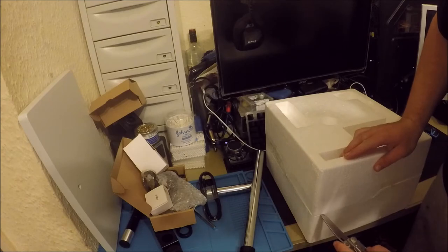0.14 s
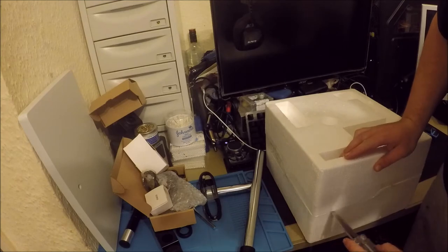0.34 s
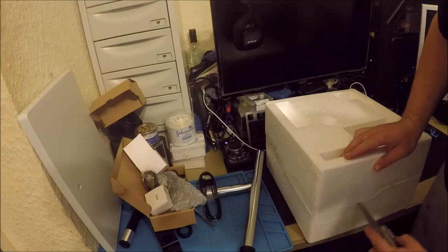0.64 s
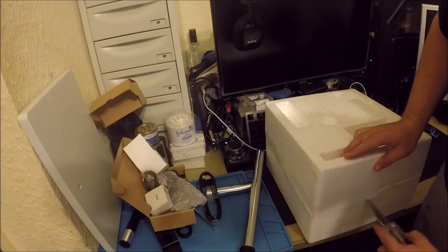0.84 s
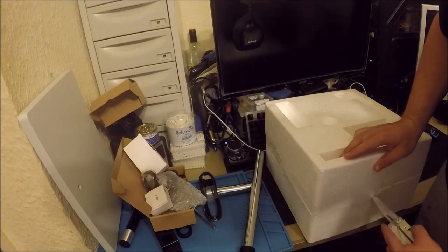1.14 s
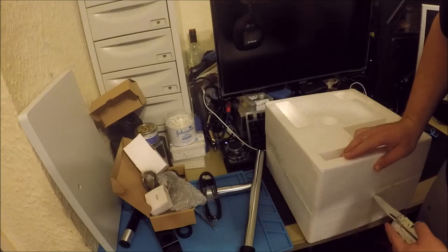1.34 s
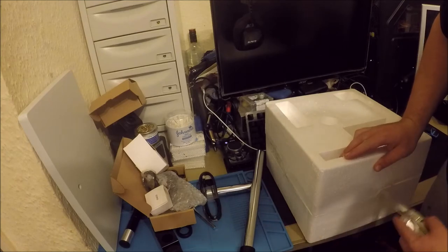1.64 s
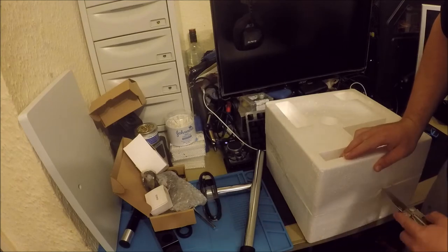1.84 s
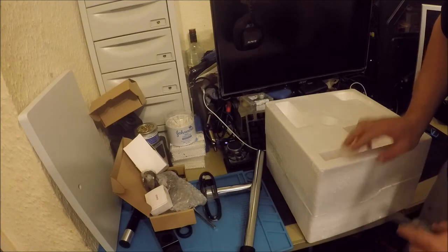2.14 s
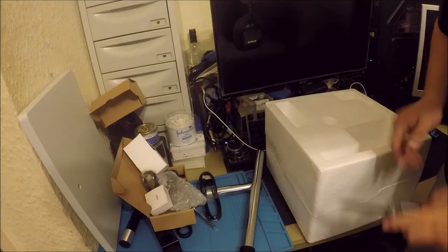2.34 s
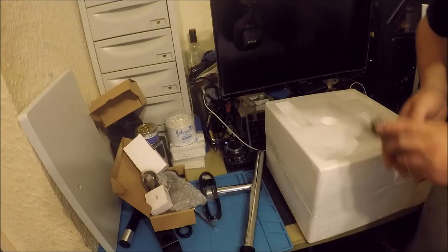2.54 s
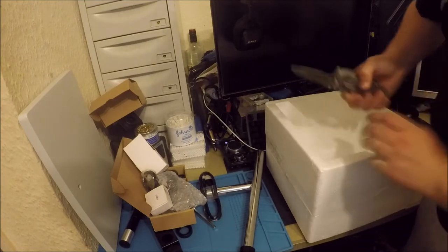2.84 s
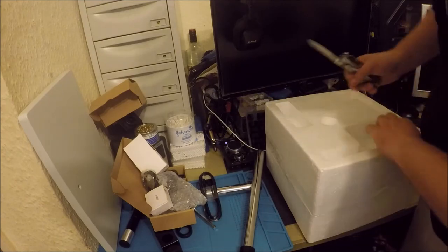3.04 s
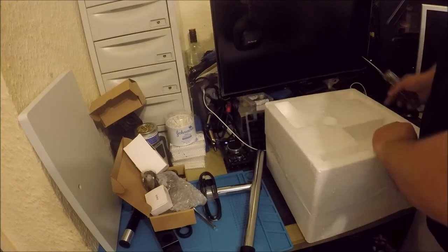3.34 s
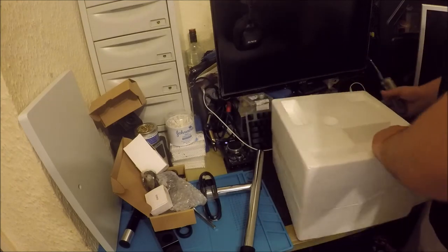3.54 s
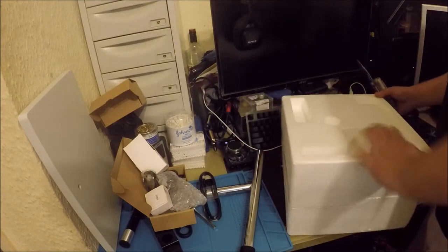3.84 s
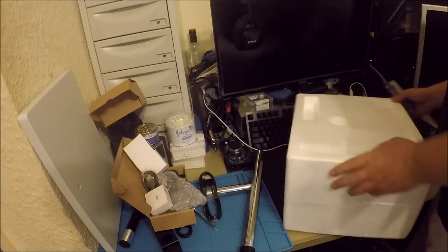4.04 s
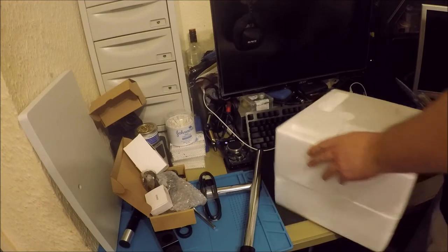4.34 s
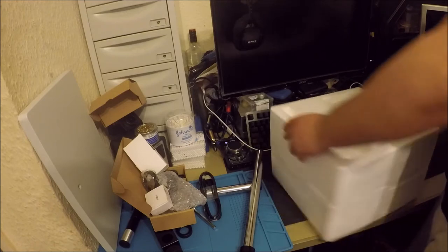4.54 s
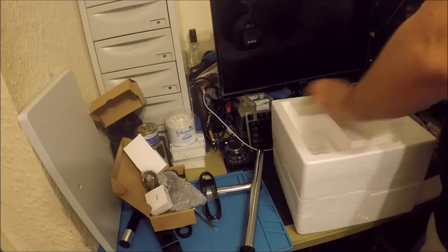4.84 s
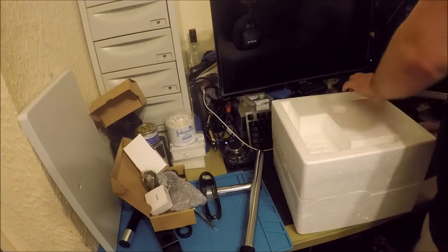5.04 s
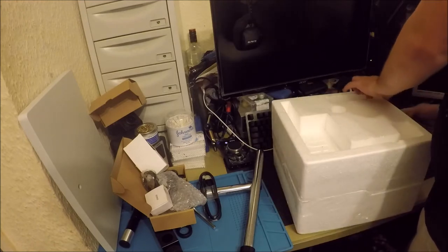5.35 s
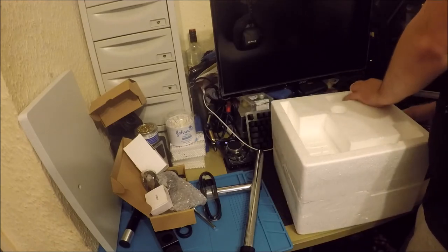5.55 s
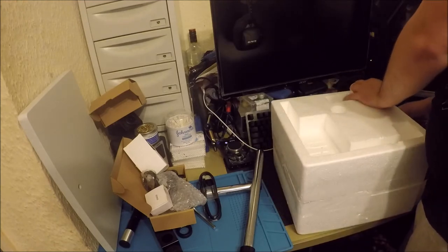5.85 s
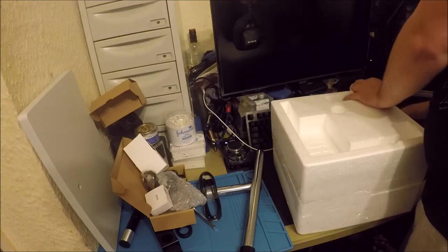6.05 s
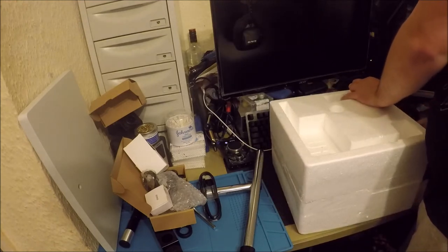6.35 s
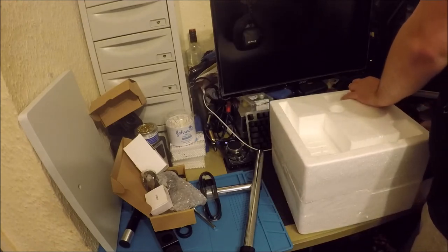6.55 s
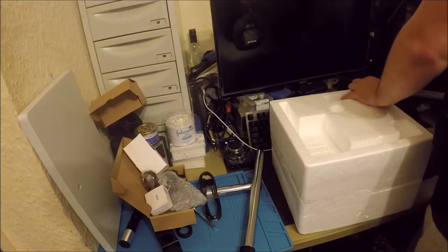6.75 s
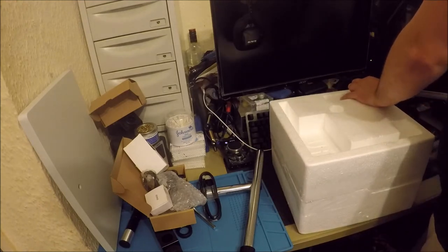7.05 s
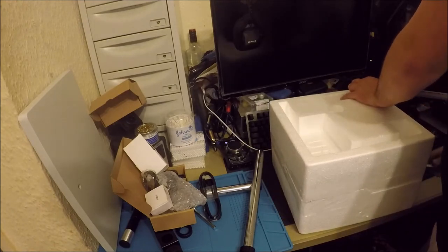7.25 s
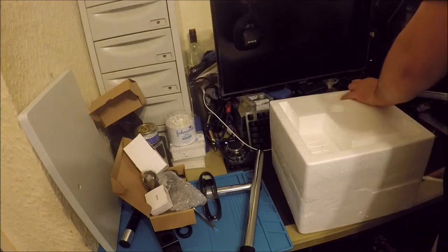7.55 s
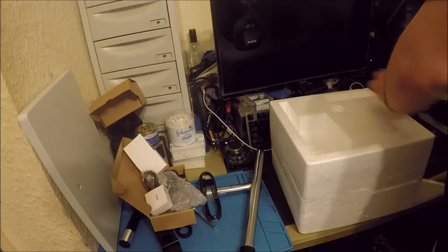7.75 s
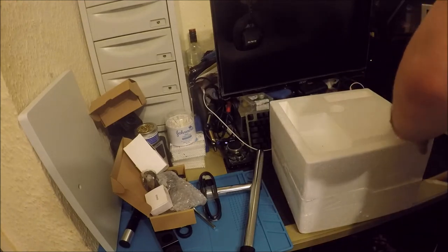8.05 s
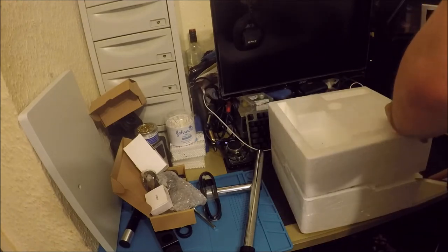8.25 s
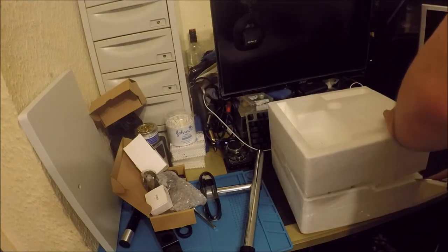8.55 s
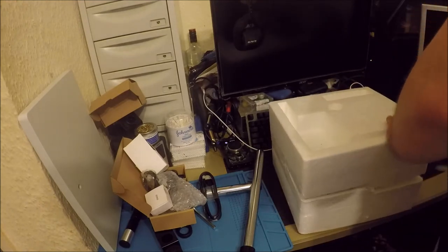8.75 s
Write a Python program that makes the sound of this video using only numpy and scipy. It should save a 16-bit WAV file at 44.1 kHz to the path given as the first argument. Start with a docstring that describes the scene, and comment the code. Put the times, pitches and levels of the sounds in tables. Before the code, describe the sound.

A hollow polystyrene box is handled close to the microphone in a small dry room, over faint low mains hum and hiss. From 0.1 to 2.1 seconds a knife makes short, uneven gritty strokes through tape, with a sharp snap at 0.5 and a harder one at 1.6. Near-quiet follows, with a barely audible puff and soft dull bump around 2.7. From 3.2 to 4.7 the box slides round in a jerky scrape, growing fuller, with clustered snaps, judders and a low grunt near 4.2. Light fingertips hiss and brighten at 5.1 to 5.4. Crackling pushes strain the lid from 5.4, with the loudest crack at 5.75. From 6 to 8 the foam creaks softly beneath pushes, pops and hollow slips, with a dense burst around 8.0 to 8.15. Another snap comes at 8.35, then a smooth sweep near 8.8.

```python
"""A polystyrene packing box on a workbench: a knife slits the tape along its seam, the box is slid round,
then fingers prise the tight lid up. Random bead releases make hiss and crackle; short noise runs make rasps,
decaying bursts make snaps and pops, and wavering sines make low grunts and one faint puff of air.
Peaks of the hollow box colour most of them.
A small room answers with short noise tails, over a low mains hum and a faint hiss."""
import sys
import numpy as np
from scipy import signal
from scipy.fft import rfft, irfft, next_fast_len
from scipy.io import wavfile
from scipy.ndimage import uniform_filter1d, map_coordinates

SR = 44100
rng = np.random.default_rng(int(sys.argv[2]) if len(sys.argv) > 2 else 0)


def waveform_to_disk(signal):
    """Save audio, clipped to [-1, 1], as 16-bit WAV at the path in sys.argv[1]."""
    frames = np.transpose(np.atleast_2d(signal))
    scaled = np.clip(frames, -1, 1) * 32767
    samples = np.round(scaled).astype(np.int16)
    wavfile.write(sys.argv[1], SR, samples)


N = 392490

# colour of smooth sliding: (frequency [Hz], relative level per Hz [dB])
SLIDE_COLOUR = [(60, -43), (170, 2), (400, -3.5), (1100, 2), (1600, -2.5), (3300, 2.5), (5000, 3.5),
                (8000, -4.5), (15000, -10.5)]
# colour of grabbing, crackling foam: (frequency [Hz], relative level per Hz [dB])
CRACKLE_COLOUR = [(60, -40.5), (190, -7), (400, 7), (1100, 1.5), (1600, -1), (3300, -2.5), (5000, -2),
                  (8000, -14), (15000, -17)]
# colour of a sudden break: (frequency [Hz], relative level per Hz [dB])
CRACK_COLOUR = [(60, -25), (220, -17.5), (500, -15.5), (1000, -8.5), (2000, 0), (3300, 2), (5000, 4.5),
                (8000, 0), (15000, -6)]


def amp(db):
    """Decibels to gain."""
    return 10 ** (np.asarray(db) / 20)


def unit(x):
    """Scaled to rms 1."""
    return x / np.sqrt(np.mean(x ** 2) + 1e-20)


def along(points, hz):
    """(Hz, value) points read on a log frequency axis."""
    f, v = np.transpose(points)
    return np.interp(np.log(hz + 1), np.log(f + 1), v)


def wobble(rate, count):
    """A smooth random curve, rate knots a second."""
    knots = rng.standard_normal(int(count * rate / SR) + 4)
    return map_coordinates(knots, [np.arange(count) * rate / SR])


def add(track, s, x):
    """Mix x into the track at time s."""
    part = track[max(round(s * SR), 0):][:len(x)]
    part += x[:len(part)]


def shaped(x, gain):
    """Causal (minimum-phase) filter with the given gain of frequency, by folding the cepstrum."""
    m = 2 * next_fast_len(len(x) // 2 + 2048)
    cepstrum = irfft(np.log(np.maximum(gain(np.fft.rfftfreq(m, 1 / SR)), 1e-6)))
    cepstrum[1:m // 2] *= 2
    cepstrum[m // 2 + 1:] = 0
    return irfft(rfft(x, m) * np.exp(rfft(cepstrum)), m)[:len(x)]


def box(hz):
    """Gain of the hollow box: resonant peaks standing on a flat response, summed as power."""
    # resonances of the box: (centre [Hz], width [Hz], peak level [dB])
    modes = [(223, 59, 3.5), (384, 97, 0.5), (550, 30, 1), (686, 310, 2), (976, 260, 0), (1160, 170, 0.5),
             (1750, 94, -4), (2125, 200, -3), (2800, 520, -2), (3346, 310, 1.5)]
    peaks = sum(amp(db) ** 2 / (1 + (2 * (hz - centre) / width) ** 2) for centre, width, db in modes)
    return np.sqrt(0.26 + peaks)


def halves(x, split_hz=1500):
    """The hollow body below the split and the surface rasp above it."""
    return [signal.sosfilt(signal.butter(4, split_hz, kind, fs=SR, output="sos"), x)
            for kind in ("low", "high")]


def beads(count, rate, spread_db):
    """Tiny impulses of uneven size at random moments: single beads letting go, rate a second."""
    hit = rng.random(count) < rate / SR
    size = amp(spread_db * np.clip(rng.standard_normal(count), -2, 2))
    return unit(hit * size * np.sign(rng.standard_normal(count)))


def background(air_db=-67, hum_hz=50.3, hum_db=-52):
    """Mains hum, a single sine, under a faint even hiss of filtered noise; both levels are rms."""
    # colour of the quiet room: (frequency [Hz], relative level per Hz [dB])
    air_colour = [(110, -36), (170, -39.5), (326, -35), (515, -42.5), (2200, -48), (15000, -60.5)]
    air = shaped(rng.standard_normal(N), lambda hz: amp(along(air_colour, hz)))
    hum = np.sqrt(2) * np.sin(2 * np.pi * hum_hz * np.arange(N) / SR)
    return amp(air_db) * unit(air) + amp(hum_db) * hum


def snaps(run_time=0.0018, burst_t60=0.026, scatter=0.27, focus_db=6, octaves=0.33,
          gain_db=4, body_lift_db=10, treble_lift_db=7):
    """A break runs in a few jumps, waves scatter through the light foam walls, and the freed piece rings briefly."""
    # tape and foam letting go at once; the gain and lifts above are added to the levels:
    # (time [s], level [dB], body re mids [dB], treble re mids [dB], ring [Hz])
    breaks = [(0.0537, -32.5, 1, -6, 2210), (0.532, -17, -9.5, -23.5, 1910), (0.5868, -26.5, -8, -16, 2020),
              (0.901, -44.5, 8, -21, 2380), (1.1014, -27, 5, -6, 4100), (1.6277, -11.5, 0.5, -17, 4800),
              (3.265, -32.5, -7.5, -7, 1766), (4.125, -22.5, -6, -8, 3570), (4.2242, -19.5, -5, -14, 3820),
              (4.2922, -25.5, -8, -10.5, 4600), (5.467, -26, -3.5, -13, 2710),
              (5.5, -24.5, -5, -17.5, 1760), (5.693, -17.5, 1, -16.5, 1750),
              (5.7458, -6.5, -3.5, -18, 2180), (6.624, -26, 3.5, -11, 2490), (7.1681, -27.5, 3, -17, 1470),
              (7.306, -23, 4, -25, 1920), (7.735, -17.5, 0, -18, 1730), (7.839, -26, -13, -13, 2720),
              (8.0253, -21.5, 2.5, -19, 1770), (8.076, -18.5, 8, -3.5, 3340), (8.098, -19.5, 0, -6.5, 3540),
              (8.349, -17.5, 1, -7.5, 2220)]
    out, t = np.zeros(N), np.arange(SR // 12) / SR
    for s, db, body_db, treble_db, ring_hz in breaks:
        release = scatter * rng.standard_normal(len(t)) * amp(-60 * t / burst_t60)
        jumps = np.append(0, rng.random(size=2) * run_time)
        release[(jumps * SR).astype(int)] += np.append(-1, rng.normal(0, 0.16, size=2))
        # each break drives the hollow body and the bright surface by its own amounts
        tone = [(950, body_db + body_lift_db), (1800, 0.016), (4000, 0), (8000, treble_db + treble_lift_db)]
        ring = lambda hz: focus_db * np.exp(-(np.log2((hz + 1) / ring_hz) / octaves) ** 2)
        crack = shaped(release, lambda hz: box(hz) * amp(along(CRACK_COLOUR, hz) + along(tone, hz) + ring(hz)))
        # levelled by the energy of the rasp half
        add(out, s + 0.0007, amp(db + gain_db) * np.pi * crack / np.linalg.norm(halves(crack)[1]))
    return out


def strokes():
    """Every stroke as (start s, end s, rasp dB, body dB, grab): each way of rubbing has its own share of crackle."""
    # strokes of the knife along the seam: (start [s], end [s], surface rasp [dB], hollow body [dB])
    knife_cuts = [(0.096, 0.207, -63, -60.5), (0.198, 0.32, -57, -52), (0.388, 0.61, -53, -60),
                  (0.539, 0.648, -46.5, -51), (0.716, 0.872, -55.5, -60), (1.056, 1.141, -63, -61),
                  (1.326, 1.398, -55, -57.5), (1.598, 1.688, -54, -51.5), (1.725, 1.792, -51.5, -61),
                  (1.846, 1.948, -71, -65.5), (2.044, 2.088, -55, -57.5)]
    # smooth sweeps of hand or box over a surface: (start [s], end [s], rasp [dB], body [dB])
    hand_sweeps = [(3.173, 3.198, -62.5, -75.5), (4.53, 4.7, -45, -51.5), (4.756, 4.777, -63, -59.5),
                   (6.115, 6.252, -50.5, -53), (8.627, 8.754, -62, -56), (8.735, 8.9, -45, -53)]
    # pushes of the fingers against the tight lid: (start [s], end [s], effort [dB])
    lid_pushes = [(5.405, 5.578, -50), (5.666, 5.889, -48.5), (5.889, 6.144, -50.5), (6.409, 6.586, -51),
                  (6.643, 6.787, -52), (6.798, 6.868, -51), (7.203, 7.383, -43.5), (7.373, 7.472, -50),
                  (7.49, 7.642, -49), (7.819, 7.857, -49.5), (8.029, 8.148, -43.5), (8.19, 8.296, -59),
                  (8.308, 8.452, -49.5), (8.471, 8.597, -58)]
    # the held lid creaks on beneath the pushes: (start [s], end [s], rasp [dB], body [dB], grab [0-1])
    grip = (6, 8, -62, -61.5, 0.6)
    cuts = [(*cut, 0.55) for cut in knife_cuts]
    sweeps = [(*sweep, 0.38) for sweep in hand_sweeps]
    # effort sets the rasp, with the hollow body 3 dB below it
    pushes = [(start, end, effort_db, effort_db - 3, 0.81) for start, end, effort_db in lid_pushes]
    return cuts + sweeps + pushes + [grip]


def drifting(x, depth_db):
    """As the contact point moves it drives other regions of the walls: peaks come and go."""
    z = signal.stft(x, nperseg=1024)[2]
    across_hz = uniform_filter1d(rng.standard_normal(z.shape), size=7, axis=0)
    field = uniform_filter1d(across_hz, size=6, axis=1)
    return signal.istft(z * amp(depth_db * unit(field)), nperseg=1024)[1][:len(x)]


def ringing_beads(rate=70, spread_db=8, sharpness=4.0):
    """Tiny releases through 15 resonators from low to high, each ringing for a few cycles."""
    pitches = np.geomspace(220, 13000, 15)
    ring = lambda hz: signal.lfilter(*signal.iirpeak(hz, sharpness, fs=SR), beads(N, rate, spread_db))
    return unit(sum(np.sqrt(hz) * unit(ring(hz)) for hz in pitches))


def rubbing(trim_db=-1, edge=0.0041, ease=0.3, arch_db=4, jerk_db=3, bead_t60=0.02, ringing_db=3):
    """Smooth sliding hisses; where the foam grabs, the stroke jerks and the beads go in clumps and crackle."""
    slide = shaped(beads(N, rate=8100, spread_db=6.5), lambda hz: amp(along(SLIDE_COLOUR, hz)) * box(hz))
    # every clump that tears loose sets off a few milliseconds of scattered waves
    fading = amp(-60 / (bead_t60 * SR))
    clumps = signal.lfilter([1], [1, -fading], np.abs(beads(N, rate=260, spread_db=11.5)))
    scattered = unit(clumps * rng.standard_normal(N))
    crackle = shaped(scattered + amp(ringing_db) * ringing_beads(),
                     lambda hz: amp(along(CRACKLE_COLOUR, hz)) * box(hz))
    slide = np.array(halves(drifting(slide, depth_db=3)))
    crackle = np.array(halves(drifting(crackle, depth_db=3.5)))
    out = turning(slide, crackle)
    for start, end, rasp_db, body_db, grab in strokes():
        # smooth strokes ease in and out, grabbing ones start more abruptly
        fade = edge + ease * (1 - grab) * (end - start)
        first, last = max(int((start - fade / 2) * SR), 0), min(int((end + fade / 2) * SR), N)
        i = np.arange(first, last)
        u = np.linspace(0, 1, len(i))
        contact = np.minimum(np.minimum(u, 1 - u) * len(i) / (fade * SR), 1)
        jerks = jerk_db * grab * wobble(44.64, len(i))
        speed = unit(contact * amp(arch_db * np.sin(np.pi * u) + jerks))
        body, rasp = [unit(speed * (np.sqrt(1 - grab) * unit(hiss) + np.sqrt(grab) * unit(grit)))
                      for hiss, grit in zip(slide[:, i], crackle[:, i])]
        out[i] += amp(trim_db) * (amp(body_db) * body + amp(rasp_db) * rasp)
    return out


def pops(cycles=11, click_db=-9, click_t60=0.019):
    """A single bead bursts: a sharp click and a ring that dies within a few cycles."""
    # beads bursting under the blade or the fingers: (time [s], peak level [dB], ring [Hz])
    bursts = [(0.181, -30.5, 3060), (0.242, -30.5, 3500), (0.533, -12, 2880), (1.115, -26.5, 9600),
              (3.299, -28.5, 2900), (3.363, -27.5, 3460), (4.151, -28.5, 3050), (4.176, -24, 3460),
              (4.196, -23.5, 3700), (5.039, -35.5, 4930), (5.42, -29.5, 2500), (5.549, -26.5, 2680),
              (5.565, -28.5, 3200), (5.647, -25.5, 3370), (5.71, -22.5, 3500), (6.454, -29, 3740),
              (6.575, -29, 2500), (7.281, -28.5, 3600), (7.352, -19.5, 4360), (8.014, -22.5, 3200),
              (8.552, -25, 3980)]
    out, t = np.zeros(N), np.arange(SR // 20) / SR
    for s, db, hz in bursts:
        ring = np.sin(2 * np.pi * hz * t) * amp(-60 * t * hz / cycles)
        noise = shaped(rng.standard_normal(len(t)), lambda f: amp(along(CRACK_COLOUR, f)) * box(f))
        click = unit(noise) * amp(-60 * t / click_t60)
        pop = ring + amp(click_db) * click
        add(out, s, amp(db) * pop / np.abs(pop).max())
    return out


def slips(octaves=1.21, trim_db=-1, even_slip_s=0.035, rasp_db_per_doubling=1.5):
    """Each slip is a quick uneven run of bead releases that drives one region of the box."""
    # short juddering slips, levels before the trim:
    # (time [s], length [s], body level [dB], centre of the driven region [Hz])
    judders = [(0.212, 0.031, -51.5, 550), (0.286, 0.031, -47.5, 706), (1.751, 0.012, -46.5, 540),
               (1.932, 0.01, -51.5, 420), (2.064, 0.011, -35, 1200), (3.459, 0.0054, -36.5, 1194),
               (3.698, 0.02, -43.5, 600), (3.76, 0.026, -39, 480), (3.989, 0.0083, -39, 600),
               (4.23, 0.025, -36, 750), (4.314, 0.012, -36, 505), (4.392, 0.0095, -35.5, 550),
               (4.431, 0.011, -36, 544), (5.707, 0.0095, -34, 500), (5.902, 0.015, -38.5, 1110),
               (5.939, 0.015, -39, 850), (6.044, 0.0091, -36, 800), (6.129, 0.0095, -42, 960),
               (6.689, 0.047, -46.5, 400), (6.984, 0.077, -44, 1090), (7.204, 0.0395, -43.5, 475),
               (7.296, 0.03, -43, 700), (7.336, 0.02, -39.5, 428), (7.614, 0.029, -41.5, 655),
               (7.804, 0.0066, -36, 480), (7.949, 0.014, -44.5, 556), (7.977, 0.025, -45, 1120),
               (8.012, 0.032, -45, 800), (8.073, 0.034, -40, 643), (8.144, 0.02, -31, 570),
               (8.213, 0.0064, -41, 640), (8.744, 0.011, -41, 604)]
    out, t = np.zeros(N), np.arange(SR // 8) / SR
    for s, length, body_db, centre_hz in judders:
        # shorter slips knock the body, longer ones rasp the surface
        rasp_db = body_db + rasp_db_per_doubling * np.log2(length / even_slip_s)
        stroke = np.minimum(t / (0.21 * length), 1) * amp(-60 * np.maximum(t - length, 0) / 0.024)
        catching = amp(2.1 * wobble(717, len(t)))  # the foam catches and lets go hundreds of times a second
        run = stroke * catching * rng.standard_normal(len(t))
        region = lambda hz: 1 / np.sqrt(1 + (np.log2((hz + 1) / centre_hz) / octaves) ** 6)
        body = unit(halves(shaped(run, lambda hz: box(hz) * region(hz)))[0])
        rasp = unit(halves(shaped(run, lambda hz: box(hz) * amp(along(CRACKLE_COLOUR, hz))))[1])
        both = amp(trim_db) * (amp(body_db) * body + amp(rasp_db) * rasp)
        add(out, s, both * np.sqrt(length / t[-1]))  # the levels hold over the length of the slip
    return out


def grunts_and_puff(waver=0.13, overtone_db=-11, sag_octaves=0.2):
    """Brief low grunts of the box walls and one faint puff of air: wavering sines that swell and sag in pitch."""
    # low grunts of the box walls, and at 2.72 s one faint low puff of air:
    # (time [s], length [s], mid pitch [Hz], level at the middle of the swell [dB])
    low_swells = [(1.622, 0.04, 296, -41.5), (2.72, 0.06, 135.5, -58), (3.452, 0.02, 1202, -36.5),
                  (3.749, 0.065, 300.7, -41), (3.993, 0.018, 138, -40), (4.198, 0.053, 568, -31.5),
                  (6.835, 0.046, 194, -45), (7.863, 0.023, 130, -46), (7.851, 0.085, 216, -47),
                  (7.948, 0.031, 205, -52), (8.062, 0.028, 101, -48), (8.138, 0.048, 236.6, -35.5)]
    out = np.zeros(N)
    for s, length, hz, db in low_swells:
        count = int(length * SR)
        pitch = hz * 2 ** (sag_octaves * np.linspace(0.5, -0.5, count))
        phase = 2 * np.pi * np.cumsum(pitch * (1 + waver * wobble(142.0, count))) / SR
        tone = np.sqrt(2) * (np.sin(phase) + amp(overtone_db) * np.sin(2 * phase))
        add(out, s, amp(db) * np.hanning(count) * tone)
    return out


def knock(s=2.733, db=-50, hz=560, t60=0.069, rumble_db=-42, rumble_hz=22, rumble_t60=2.9):
    """A soft bump as the hands let go: a dull knock of noise, with a deep rumble that dies slowly."""
    t = np.arange(SR) / SR
    dull = shaped(rng.standard_normal(SR), lambda f: 1 / (1 + (2 * np.log2((f + 1) / hz)) ** 4))
    deep = shaped(rng.standard_normal(SR), lambda f: 1 / (1 + (f / rumble_hz) ** 3))
    both = amp(db - 60 * t / t60) * unit(dull) + amp(rumble_db - 60 * t / rumble_t60) * unit(deep)
    out = np.zeros(N)
    add(out, s, both * np.minimum(t * hz / 2, 1))
    return out


def turning(slide, crackle, grab=0.36, body_trim_db=-0.5, jerk_db=0.5, jerk_rate=25):
    """The box slides round on the bench in one long, slightly jerky scrape."""
    # the scrape, body before its trim: (time [s], rasp level [dB], body level [dB])
    scrape = [(3.25, -68, -61), (3.31, -57.5, -54.5), (3.416, -60.5, -58), (3.456, -55.5, -56.5),
              (3.848, -49.5, -51), (4.212, -49.5, -51), (4.332, -49.5, -43.5), (4.53, -54, -47.5)]
    s, rasp_db, body_db = np.transpose(scrape)
    t = np.arange(N) / SR
    level = lambda db: amp(np.interp(t, s, db, left=-120, right=-120))
    body, rasp = [np.sqrt(1 - grab) * unit(hiss) + np.sqrt(grab) * unit(grit)
                  for hiss, grit in zip(slide, crackle)]
    jerks = amp(jerk_db * wobble(jerk_rate, N))
    return jerks * (level(body_db + body_trim_db) * body + level(rasp_db) * rasp)


def fingertips(bright_db=-12.5, brighten_db_per_s=45):
    """Fingertips glide lightly over the lid: a hiss in two of its resonances that brightens as they speed up."""
    # the glide: (time [s], level [dB])
    glide = [(5.06, -84), (5.09, -53.5), (5.16, -54.5), (5.19, -48), (5.333, -45), (5.36, -76.5),
             (5.4, -54), (5.45, -69)]
    # resonances of the lid: (centre [Hz], width [Hz], peak level [dB])
    lid_modes = [(1120, 180, 2.5), (2480, 730, 4.5)]
    s, db = np.transpose(glide)
    t = np.arange(N) / SR
    grains = beads(N, rate=7400, spread_db=4.5)
    peaks = lambda hz: sum(amp(g) / np.hypot(1, 2 * (hz - centre) / width) for centre, width, g in lid_modes)
    lid = shaped(grains, lambda hz: peaks(hz) * hz / np.hypot(hz, 800))  # thinned below 800 Hz
    fizz = halves(shaped(grains, lambda hz: amp(along(SLIDE_COLOUR, hz))))[1]
    # the brightening stops at the third point from the end
    fizz_db = bright_db + brighten_db_per_s * (np.minimum(t, s[-3]) - s.mean())
    hiss = unit(lid) + amp(fizz_db) * unit(fizz)
    return hiss * amp(np.interp(t, s, db, left=-120, right=-120))


def room(x, delay=0.005):
    """The diffuse answer of the small cluttered room: a new noise tail each third of a second, as box and arms move."""
    # decay of the room: (frequency [Hz], t60 [s])
    decay = [(200, 0.071), (1000, 0.16), (4000, 0.12), (12000, 0.21)]
    out, step = np.zeros(N), SR // 3
    for i in range(0, N, step):
        hz, t, z = signal.stft(rng.standard_normal(SR // 2), SR, nperseg=256)
        tail = signal.istft(z * amp(-60 * t / along(decay, hz)[:, None]), SR, nperseg=256)[1]
        add(out, i / SR + delay, signal.fftconvolve(x[i:i + step], tail / np.linalg.norm(tail)))
    return out


def scene(room_db=-9):
    """All the box sounds in the room, over its hum and hiss."""
    foam = snaps() + rubbing() + pops() + slips() + grunts_and_puff() + knock() + fingertips()
    return (foam + amp(room_db) * room(foam) + background())[None]


def record(dry, top_hz=15300):
    """A steep band limit: nothing passes above top_hz."""
    m = next_fast_len(N + SR // 4)
    return irfft(rfft(dry, m) * (np.fft.rfftfreq(m, 1 / SR) < top_hz), m)[:, :N]


dry = scene()
out = record(dry)
waveform_to_disk(out)
```